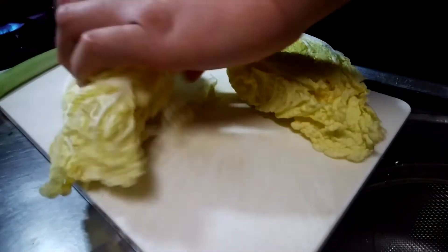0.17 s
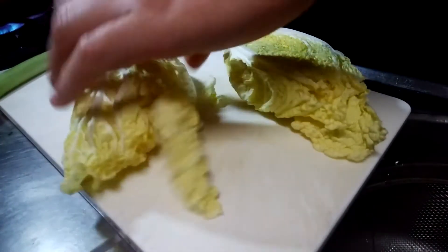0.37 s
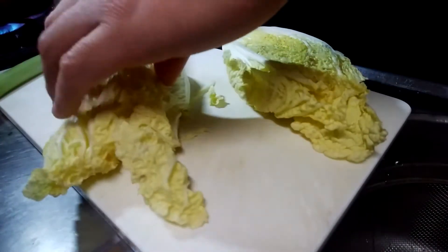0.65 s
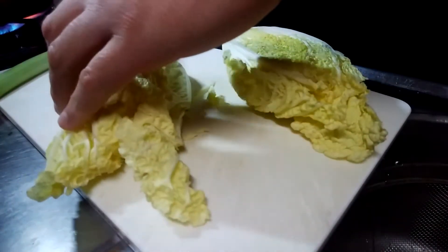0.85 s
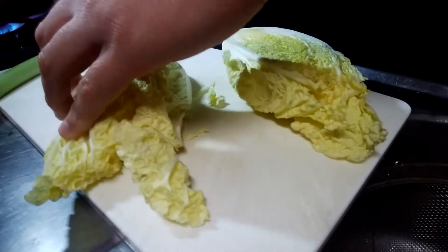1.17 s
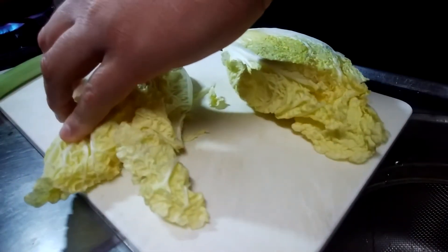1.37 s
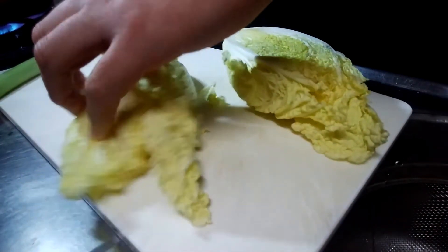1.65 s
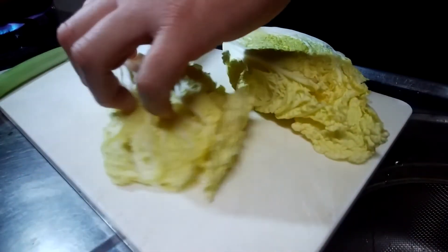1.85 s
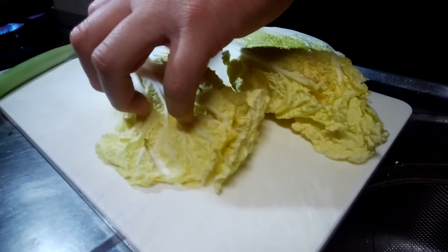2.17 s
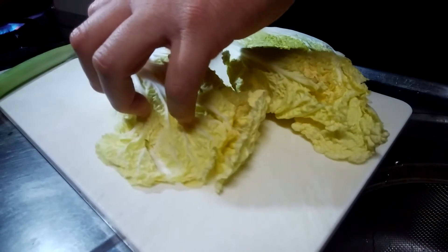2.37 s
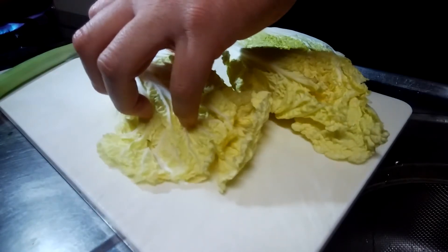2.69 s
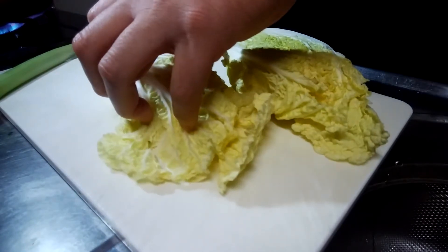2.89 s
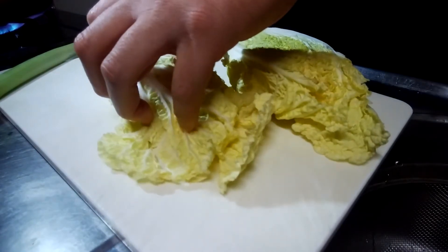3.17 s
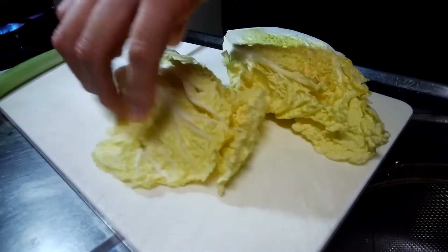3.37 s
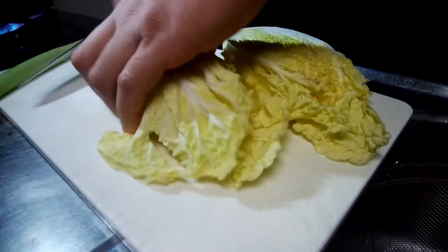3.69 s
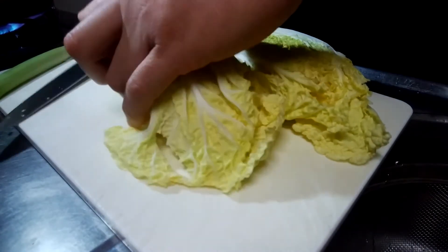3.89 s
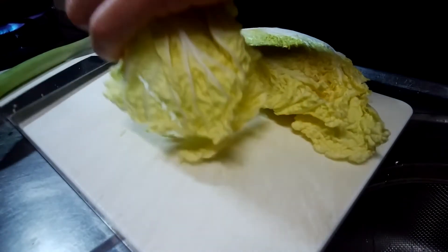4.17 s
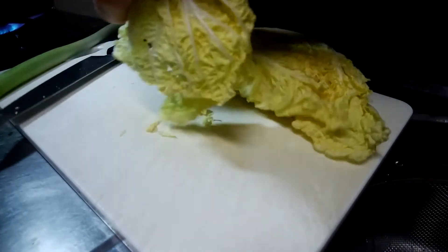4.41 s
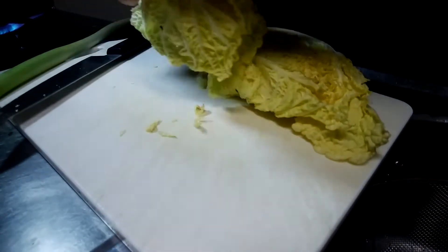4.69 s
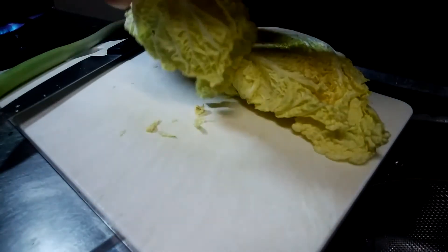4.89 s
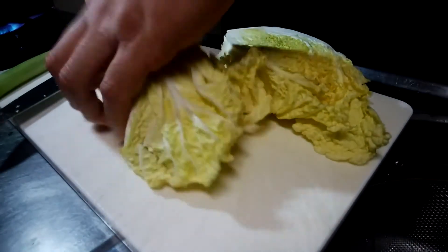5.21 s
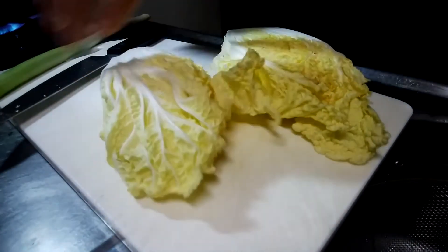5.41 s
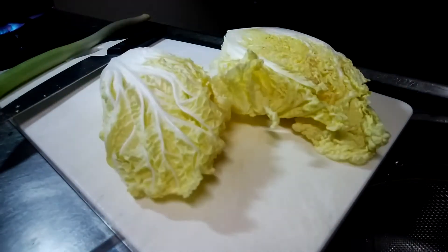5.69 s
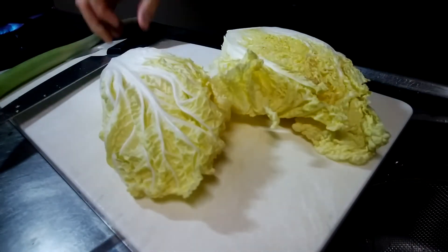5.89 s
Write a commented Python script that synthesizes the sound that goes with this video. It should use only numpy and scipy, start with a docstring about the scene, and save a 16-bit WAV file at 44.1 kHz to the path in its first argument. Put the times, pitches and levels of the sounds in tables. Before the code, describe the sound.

Close-up kitchen handling: leafy crackles and sharp rib snaps, boomy knocks through a thin metal counter, and a briefly rattling knife handle.

```python
"""Cabbage leaves on a steel counter

Crisp leaves are handled on a cutting board: grainy noise rustles and short noise bursts snap.
The board lies on a thin steel counter; pushes drive its modes with jolting noise and sway the cabinet's low tones.
Blows strike those modes afresh, with a board knock, a cabinet thud and a crack of noise.
A knife is laid down and its handle rocks to rest as buzzing modes, over soft room tone.
A fast limiter ducks everything under the heaviest thuds."""
import sys
import numpy as np
from scipy import signal
from scipy.fft import rfft, irfft, next_fast_len
from scipy.io import wavfile
from scipy.ndimage import uniform_filter1d, minimum_filter1d, map_coordinates

SR = 44100
rng = np.random.default_rng(int(sys.argv[2]) if len(sys.argv) > 2 else 0)


def digitize_waveform(pressure):
    """Quantize a signal to 16-bit integers and store it at the path in sys.argv[1].

    Rows of a 2-D input are taken as channels; values are limited to [-1, 1].
    """
    field = np.atleast_2d(pressure).T
    bounded = np.clip(field, -1, 1)
    quanta = np.round(bounded * 32767).astype(np.int16)
    wavfile.write(sys.argv[1], SR, quanta)


N = 266805


def amp(db):
    """Decibels to gain."""
    return 10 ** (np.asarray(db) / 20)


def unit(x):
    """Scale to rms 1."""
    return x / np.sqrt(np.mean(x ** 2) + 1e-20)


def noise(length=N):
    """White noise."""
    return rng.standard_normal(length)


def wobble(rate):
    """A smooth random curve with rate knots a second."""
    knots = rng.standard_normal(int(N * rate / SR) + 4)
    return map_coordinates(knots, [np.arange(N) * rate / SR])


def filtered(x, response):
    """Shape the spectrum of x by a response of frequency."""
    size = next_fast_len(len(x) + SR)
    hz = np.fft.rfftfreq(size, 1 / SR)
    return irfft(rfft(x, size) * response(hz), size)[:len(x)]


def coloured(x, points):
    """EQ x through (f/Hz, level/dB) points on a log axis, then scale to rms 1."""
    f, db = np.transpose(points)
    return unit(filtered(x, lambda hz: amp(np.interp(np.log(hz + 1), np.log(f + 1), db))))


def ring(modes, t, scatter_db, tilt=((1, 0), (SR, 0))):
    """Decaying sine modes, newly scattered in pitch and level; tilt (f/Hz, level/dB) is where and how hard they are hit."""
    hz, db, t60 = np.transpose(modes)[:, :, None]
    level_draw, pitch_draw = rng.standard_normal((2, len(modes), 1))
    mode_db = db + np.interp(hz, *np.transpose(tilt)) + scatter_db * level_draw
    tones = np.sin(2 * np.pi * hz * (1 + 0.01845 * pitch_draw) * t)
    return np.sum(amp(mode_db - 60 * t / t60) * tones, axis=0)


def attack(t, rise_s):
    """An exponential swell from silence."""
    return 1 - np.exp(-t / rise_s)


def add(track, s, sound):
    """Mix sound into track at s seconds."""
    part = track[round(s * SR):][:len(sound)]
    part += sound[:len(part)]


def gestures(start_s, held_s, db, rise_db_s, fall_db_s):
    """Gain of overlapping gestures: each swells to its level by its start, holds it and dies away."""
    t = np.arange(0, N / SR + .002, .001)[:, None]
    before_s = np.maximum(start_s - t, 0)
    after_s = np.maximum(t - start_s - held_s, 0)
    each_db = db - rise_db_s * before_s - fall_db_s * after_s
    gain = np.sqrt(np.sum(amp(each_db) ** 2, axis=1))
    return np.interp(np.arange(N) / SR, t[:, 0], gain)


# room tone colour: (f/Hz, relative level/dB)
ROOM_COLOUR = [(20, -30), (30, -14), (42, 1.5), (60, -0.5), (110, -3), (300, -18.5), (900, -23),
               (1800, -32.5), (4500, -40), (7500, -24), (11000, -23), (13000, -45), (16000, -40)]


def room_tone():
    """Soft coloured noise whose level drifts slowly."""
    return amp(-53.5 + wobble(2.26)) * coloured(noise(), ROOM_COLOUR)


# the hand pushes the board against the counter:
# (start t/s, held t/s, steel level/dB, high modes re steel level/dB, lower sway level/dB, upper sway level/dB)
HAND_PUSHES = [(0, 0.0067, -44, -13, -25, -27), (0.201, 0.085, -21.5, -13.5, -25.5, -11),
               (0.398, 0.21, -39, -14, -19.5, -21), (.8, 0.27, -47.5, -21.5, -36, -34),
               (1.315, 0.071, -19, -9, -19.5, -16.5), (1.41, 0.1, -41, -2, -25, -50),
               (1.729, 0.088, -33.5, -11, -27.5, -27.5), (1.87, 0.21, -39.5, -20, -30, -35.5),
               (2.119, 0.065, -40.5, -31, -23.5, -23), (2.73, .04, -57, -12, -60, -65),
               (2.794, 0.086, -23, -7, -19, -17), (2.97, 0.034, -37, -20, -23, -31),
               (3.04, 0.051, -24.5, -27, -28, -27), (3.166, 0.032, -23, -12.5, -27.5, -44),
               (3.41, 0.038, -40.5, -12.5, -27.5, -33), (3.566, 0.11, -22.5, -32, -27, -14.5),
               (3.7, 0.11, -35.5, -13, -26.5, -27), (3.88, 0.05, -22, -8.5, -27.5, -18.5),
               (4.016, .29, -19, -11.5, -20.5, -21.5), (4.419, 0.061, -25, -16, -20.5, -25),
               (4.62, 0.092, -37.5, -11.5, -34, -22), (4.78, 0.063, -36.5, -18, -34, -20.5),
               (4.91, 0.17, -39, -25.5, -31, -28.5), (5.294, 0.076, -33, -16, -18.5, -17),
               (5.325, 0.031, -26.5, -16.5, -27, -36), (5.886, 0.062, -35.5, -46, -55, -48),
               (6.04, .05, -29, -12.5, -29, -21.5)]
PUSH_RISE_DB_S = 1500
SWAY_HZ = (54.87, 71.2, 39.06)  # lower, upper, and a deeper mode that moves with the lower one
SWAY_FALL_DB_S = (85, 137, 85)
DEEP_DB = -10  # deeper mode re lower


def sway():
    """Low cabinet modes, driven unsteadily by the pushes, drift in pitch and beat against each other."""
    track = np.zeros(N)
    start_s, held_s, _, _, lower_db, upper_db = np.transpose(HAND_PUSHES)
    levels_db = (lower_db, upper_db, lower_db + DEEP_DB)
    for level_db, fall_db_s, mode_hz in zip(levels_db, SWAY_FALL_DB_S, SWAY_HZ):
        phase = 2 * np.pi * np.cumsum(mode_hz + 4 * wobble(9)) / SR
        level = gestures(start_s, held_s, level_db, PUSH_RISE_DB_S, fall_db_s)
        unsteady = amp(3.76 * wobble(22))
        track += np.sqrt(2) * level * unsteady * np.sin(phase)
    return track


# modes of the thin steel counter top: (f/Hz, relative level/dB, t60/s)
STEEL_MODES = [(176.9, -2.5, 0.28), (264.25, -7.5, 0.49), (373.8, -6.5, 0.43), (416.7, -15.5, 0.61),
               (525, -19, 0.45), (621, -19, 0.7), (692.7, -10.5, 0.25), (776, -2.5, 0.046),
               (839.7, -16.5, 0.31), (881.5, -11, 0.28), (1127, -27, 0.17), (1308, -27, 0.11),
               (1347, -24.5, 0.2), (1481, -29, 0.25)]
STEEL_FALL_DB_S, HIGH_FALL_DB_S = 90.5, 125  # how fast each part dies once the hand lets go
HIGH_HELD = 0.47  # share of a push for which the board still slides
MIDDLE_DB, MIDDLE_FOLLOWS = -7.5, 0.41  # middle re low modes; share of the high modes' dB they follow


def counter():
    """The steel rings in its modes as the board shifts on it in small jolts; sliding wakes the higher ones."""
    start_s, held_s, steel_db, high_db = np.transpose(HAND_PUSHES)[:4]

    def pushed(db, fall_db_s, share=1):
        """Gain of one band of modes under the pushes."""
        return gestures(start_s, share * held_s, steel_db + db, PUSH_RISE_DB_S, fall_db_s)

    body = ring(STEEL_MODES, np.arange(SR // 2) / SR, scatter_db=2.5)
    jolts = amp(2.5 * wobble(35)) * noise()
    dull = coloured(jolts, [(60, -33), (100, 2.5), (250, -0.5), (600, -10.5), (1400, -23), (3000, -45.5)])
    shaken = unit(signal.fftconvolve(jolts, body)[:N]) + 1.97 * dull

    def below(edge_hz):
        """The shaken steel under a smooth band edge."""
        return filtered(shaken, lambda hz: 1 / (1 + (hz / edge_hz) ** 8))

    low, up_to_middle = below(269), below(435)
    middle, high = up_to_middle - low, shaken - up_to_middle
    middle_db = MIDDLE_DB + MIDDLE_FOLLOWS * high_db
    return (pushed(0, STEEL_FALL_DB_S) * unit(low)
            + pushed(middle_db, STEEL_FALL_DB_S) * unit(middle)
            + pushed(high_db, HIGH_FALL_DB_S, HIGH_HELD) * unit(high))


# fine rustle with two treble peaks: (f/Hz, relative level/dB)
LEAF_COLOUR = [(2060, -18), (3500, -28), (4970, -34), (5820, -19.5), (6440, -10), (7510, 3.5), (9560, -1.5),
               (10700, 3), (11400, 0), (12400, -10.5), (16000, -13)]
# coarser scrape: (f/Hz, relative level/dB)
SCRAPE_COLOUR = [(1500, -9), (2100, -3.5), (2600, 0), (4000, -2), (6000, 2), (9000, -34)]
# leaves rubbing: (start t/s, held t/s, rustle level/dB, scrape re rustle level/dB)
LEAF_RUBS = [(0, 0.034, -41.5, -8), (.116, 0.054, -40.5, -25), (.185, 0.011, -37.5, -5.5),
             (.29, 0.029, -38.5, -8), (.41, 0.11, -47, -7.5), (.63, 0.28, -51, -13),
             (1.056, 0.029, -47.5, -18), (1.31, 0.031, -41.5, 0), (1.51, 0.039, -49.5, -9.5),
             (1.63, .07, -49, -11.5), (1.761, 0.065, -36.5, -8.5), (1.94, 0.066, -41, -12.5),
             (2.2, 0.024, -55, -19), (2.37, 0.074, -51, -41), (2.76, .01, -57.5, -8),
             (2.787, 0.036, -43.5, -2.5), (3.01, 0.11, -46.5, -15.5), (3.17, 0.064, -48.5, -15),
             (3.34, 0.11, -43, -10), (3.7, 0.063, -40, -13.5), (3.82, 0.21, -45, -11.5),
             (4.06, 0.054, -44, -1), (4.135, 0.035, -44.5, 5), (4.23, 0.057, -45.5, -11),
             (4.43, 0.056, -44, -21), (4.667, 0.04, -42, -5), (4.77, 0.23, -48, -23),
             (5.145, 0.022, -44, -25), (5.231, 0.097, -39.5, -7.5), (5.38, 0.03, -45.5, -12),
             (5.55, .4, -54.5, -23), (5.76, 0.026, -52.5, -20), (6.03, .03, -53, -6)]
RUB_RISE_DB_S, RUB_FALL_DB_S, SCRAPE_FALL_DB_S = 229, 119, 149
SUDDEN_S, SUDDEN_RISE_DB_S = .02, 3000  # a rub this soon after a snap starts this fast


def crumple(density, spike_db):
    """Many tiny leaf cracks on soft noise; patches of the spectrum brighten and fade."""
    cracks = (rng.random(N) < density / SR) * amp(spike_db * rng.exponential(size=N))
    crack_decay = amp(-60 * np.arange(900) / SR / 0.0053)
    bursts = np.convolve(cracks, crack_decay)[:N]
    spectrum = signal.stft((1 + 0.39 * bursts) * noise(), nperseg=256)[2]
    patches = uniform_filter1d(noise(spectrum.shape), 7, 0)  # smooth over frequency
    patches = uniform_filter1d(patches, 8, 1)  # and over time
    return signal.istft(spectrum * amp(3.06 * unit(patches)), nperseg=256)[1][:N]


def rustle():
    """Rubbing leaves crackle finely over a coarser scrape, both following the strength of each rub."""
    start_s, held_s, rub_db, scrape_db = np.transpose(LEAF_RUBS)
    since_snap = start_s - np.transpose(RIB_SNAPS)[0][:, None]
    # leaves that a snap sets free start almost at once, the others swell
    freed = np.any((since_snap > 0) & (since_snap < SUDDEN_S), axis=0)
    rise_db_s = np.where(freed, SUDDEN_RISE_DB_S, RUB_RISE_DB_S)
    fine = amp(1.57 * wobble(45)) * coloured(crumple(density=190, spike_db=4), LEAF_COLOUR)
    coarse = amp(0.86 * wobble(25)) * coloured(crumple(density=170, spike_db=4), SCRAPE_COLOUR)
    fine_gain = gestures(start_s, held_s, rub_db, rise_db_s, RUB_FALL_DB_S)
    coarse_gain = gestures(start_s, held_s, rub_db + scrape_db, rise_db_s, SCRAPE_FALL_DB_S)
    return fine_gain * fine + coarse_gain * coarse


# leaf ribs snapping: (t/s, nominal peak level/dB, low part re bright part level/dB)
RIB_SNAPS = [(0.1098, -22.5, -39), (0.196, -6, -3), (0.2816, -19.5, -13), (0.3, -22, -4),
             (0.5598, -21.5, -18), (1.05, -30, -36), (1.3007, -8, -42), (1.514, -27, -18),
             (1.6463, -28, -15), (1.725, -27, -19), (1.942, -24, -25), (2.0522, -22, -43),
             (2.778, -13.5, -21), (3.1486, -24, -6.5), (3.3563, -23.5, -37), (3.6134, -27, -14),
             (3.706, -28, -27), (3.7227, -15, -28), (3.7876, -26, -20), (3.8653, -15, -4),
             (3.9183, -22.5, -5), (3.9597, -24, -13), (3.9822, -16.5, -39), (4.004, -7, -16),
             (4.0546, -5.5, -9), (4.129, -23, 4), (4.228, -21, -22.5), (4.306, -25.5, -14),
             (4.6597, -24, 3), (5.1374, -22, -36), (5.3405, -27.5, -15)]
SNAP_CREST_DB = 6.5  # allowance for the peak of a snap over its rms


def snaps():
    """A breaking rib gives a sharp noise burst with a short, weaker echo tail."""
    track, t = np.zeros(N), np.arange(SR // 5) / SR
    for s, db, low_db in RIB_SNAPS:
        burst = noise(len(t))
        shape = (amp(-60 * t / 0.011) + 0.41 * amp(-60 * t / 0.12)) * attack(t, 0.002)
        colour = coloured(burst, LEAF_COLOUR) + amp(low_db) * coloured(burst, SCRAPE_COLOUR)
        add(track, s, amp(db - SNAP_CREST_DB) * shape * colour)
    return track


# modes of the knife: (f/Hz, relative level/dB, t60/s)
KNIFE_MODES = [(206.6, 2.5, 0.68), (431, -0.5, 0.29), (688, 1.5, 0.1), (922, 2, 0.17), (1228, 2, 0.12),
               (1355, -2.5, 0.18), (1660, 1.5, 0.068), (2190, 0, 0.053), (2380, -18, .06),
               (2690, -12.5, 0.19), (3140, -3.5, 0.055), (3800, -8.5, 0.062), (5130, -10, 0.078)]
# its handle rocking on the steel: (t/s, level/dB, blade share level/dB)
HANDLE_ROCKS = [(3.869, -24.5, 0.5), (4.006, -15, -6.5), (4.079, -29, -3.5), (4.133, -23.5, -4),
                (4.165, -28, -4), (4.252, -22.5, -9.5), (4.426, -28, -32), (4.472, -29, -21),
                (4.607, -38.5, -24), (4.655, -38.5, -40), (4.766, -37.5, -39), (4.888, -40, -25),
                (4.989, -56, -29)]


def rocking_knife():
    """Each rock strikes the knife's modes; the loose knife buzzes on the steel, so the ring flutters."""
    track, t = np.zeros(N), np.arange(SR // 2) / SR
    for s, db, blade_db in HANDLE_ROCKS:
        chatter = amp(1.72 * unit(uniform_filter1d(noise(len(t)), 250)))
        tones = ring(KNIFE_MODES, t, 2.0, [(700, 0), (1100, blade_db)])
        add(track, s, amp(db) * chatter * tones * attack(t, 0.0029))
    return track


# cabinet under the counter: (f/Hz, relative level/dB, t60/s)
CABINET_MODES = [(38.7, -10.5, 0.11), (54.2, -4.5, 0.19), (69.6, 6, 0.17), (111.5, -8, 0.38)]
# dead sound of the plastic board: (f/Hz, relative level/dB)
BOARD_COLOUR = [(150, -24), (400, 12), (800, -1.5), (1400, -9), (1800, -8), (2400, -23), (3500, -34.5)]
# first contact of a blow: (f/Hz, relative level/dB)
CRACK_COLOUR = [(500, -20), (1200, -5.5), (2500, 7.5), (4500, -2.5), (7000, 5), (12000, -35)]
# blows on the counter: (t/s, ring level/dB, high modes re ring level/dB, thud level/dB, crack level/dB)
COUNTER_BLOWS = [(0.198, -17.5, 3.5, -16, -16), (.201, -42, -18.5, -5.5, -60), (0.259, -23, -22, -21, -36),
                 (0.559, -39.5, -6, -25, -44), (1.303, -14, 1, -9.5, -23.5),
                 (1.363, -4.5, -0.5, -13.5, -26), (1.987, -42.5, -2, -24, -45),
                 (2.002, -38.5, -20, -21.5, -60), (2.124, -45, -22, -23.5, -55),
                 (2.781, -15.5, -3.5, -14, -26.5), (2.823, -9.5, -2, -40, -35), (2.88, -7.5, -17, -28, -45),
                 (3.035, -23.5, -11, -36, -58), (3.061, -24, -26, -22, -42), (3.153, -14.5, 0.5, -25, -40),
                 (3.18, -8, -24, -28, -50), (3.405, -33.5, -5.5, -29, -62), (3.565, -48, -32, -12, -56),
                 (3.617, -25.5, -9.5, -39, -51), (3.671, -20, -11, -26, -63), (3.864, -18, -2.5, -11, -31),
                 (4.002, -7.5, -2.5, -17, -17.5), (4.018, -27, -27, -2, -60),
                 (4.054, -12, -1.5, -13.5, -27), (4.135, -8.5, -6, -12, -21.5), (4.231, -14, -7, -28, -35),
                 (4.252, -15, 5.5, -31, -41), (5.316, -17, -7.5, -13, -41)]
LOW_OVER_THUD_DB = 5.5  # a heavy blow also sounds the lowest modes of the steel
THUD_LAG_S = 0.0051  # the cabinet answers just after the steel


def blows():
    """Each blow knocks the board, rings the steel, thuds in the cabinet and starts with a crack."""
    track, t = np.zeros(N), np.arange(SR // 2) / SR
    damped = 0.32 + amp(-60 * t / 0.14)  # the board settles on the steel and takes the first ring away
    # a crack is a tick with a weaker, longer tail
    sharp = (amp(-60 * t / .016) + .4 * amp(-60 * t / .09)) * attack(t, .0015)
    for s, ring_db, high_db, thud_db, crack_db in COUNTER_BLOWS:
        low_db = np.clip(thud_db + LOW_OVER_THUD_DB - ring_db, -14, 12)
        # soft contacts crack little and swell slowly
        rise_s = 0.0025 * np.clip(amp(-.6 * (crack_db + 43)), 1, 8)
        tilt = [(265, low_db), (370, 0), (530, 0), (620, high_db + 2.5)]
        steel = damped * ring(STEEL_MODES, t, 3.4, tilt)
        knock = amp(high_db - 2 - 60 * t / 0.13) * coloured(noise(len(t)), BOARD_COLOUR)
        crack = amp(crack_db) * sharp * coloured(noise(len(t)), CRACK_COLOUR)
        thud = amp(thud_db) * ring(CABINET_MODES, t, scatter_db=1.5) * attack(t, 0.002)
        add(track, s, amp(ring_db) * (steel + knock) * attack(t, rise_s) + crack)
        add(track, s + THUD_LAG_S, thud)
    return track


def scene():
    """Mix room tone, cabinet, counter, leaves, knife and blows."""
    background = room_tone() + sway() + counter()
    return (background + rustle() + snaps() + rocking_knife() + blows())[None]


TOP_HZ = 15900


def record(dry):
    """A fast limiter ducks around peaks, overshoots are rounded off, and the band is limited at both ends."""
    needed = np.minimum(1, amp(-9.8) / (np.abs(dry[0]) + 1e-9))
    # the hold reaches mostly after a peak, then the gain steps are smoothed
    held = minimum_filter1d(needed, int(.016 * SR), origin=int(.005 * SR))
    limited = dry[0] * uniform_filter1d(held, int(.007 * SR))
    rounded = limited / (1 + np.abs(limited / .4) ** 6) ** (1 / 6)
    # nothing passes above TOP_HZ; the bass rolls off around 25 Hz
    return filtered(rounded, lambda hz: (hz < TOP_HZ) * hz ** 2 / (hz ** 2 + 25 ** 2))[None]


dry = scene()
out = record(dry)
digitize_waveform(out)
```